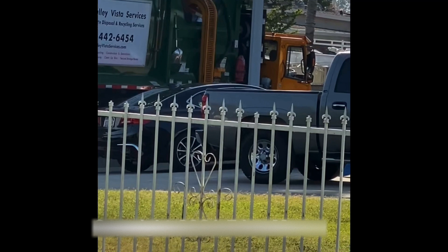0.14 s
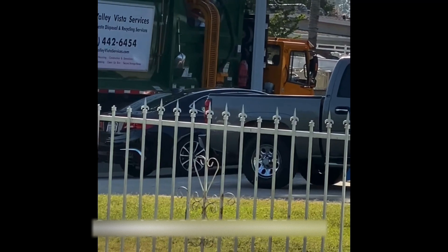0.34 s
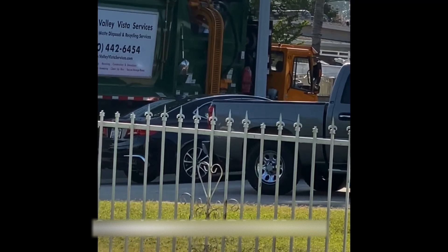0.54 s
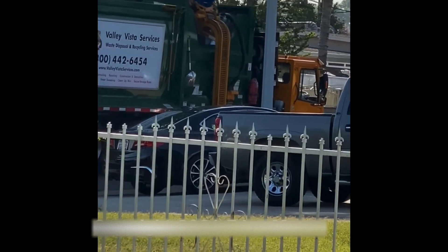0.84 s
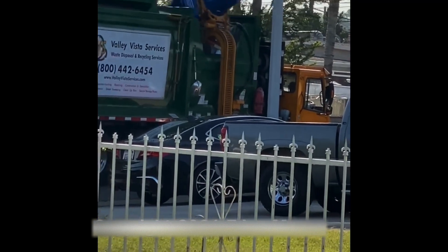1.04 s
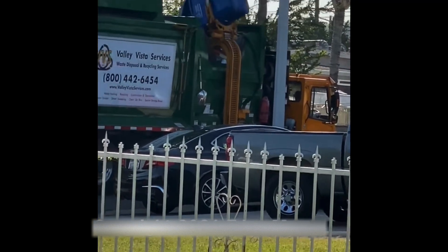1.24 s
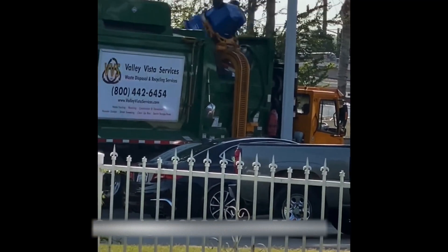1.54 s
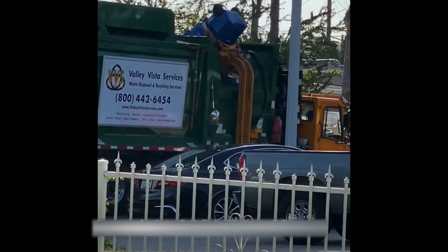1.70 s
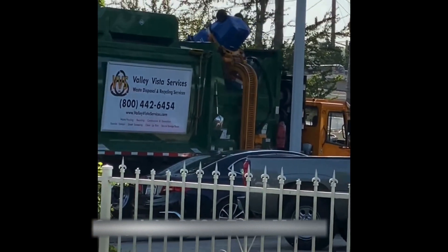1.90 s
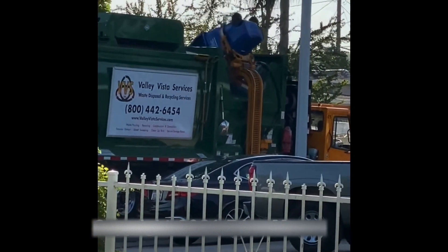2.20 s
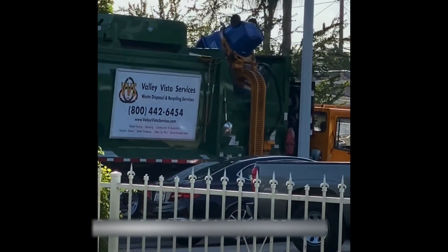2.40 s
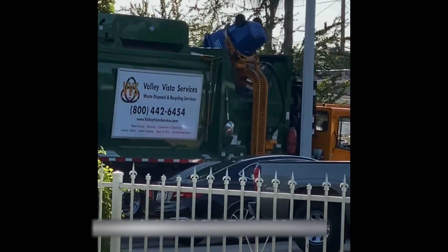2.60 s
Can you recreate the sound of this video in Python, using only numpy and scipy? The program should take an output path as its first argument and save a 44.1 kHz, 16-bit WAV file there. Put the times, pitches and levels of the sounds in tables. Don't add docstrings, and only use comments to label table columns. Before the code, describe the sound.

Loud rattling metal clanks from a refuse truck tipping a bin, with loose links clinking, panels ringing and low hopper thuds; a short pause, then renewed banging over faint engine rumble, outdoors, from a handheld microphone across the street.

```python
import sys
import numpy as np
from scipy import signal
from scipy.fft import rfft, irfft, next_fast_len
from scipy.io import wavfile
from scipy.ndimage import uniform_filter1d

SR = 44100
rng = np.random.default_rng(int(sys.argv[2]) if len(sys.argv) > 2 else 0)


def nominal_scale(level):
    x = np.asarray(level, float) / 20
    return 10 ** x


def bounce(signal):
    frames = np.transpose(np.atleast_2d(signal))
    limited = np.clip(frames, -1, 1)
    pcm = np.round(limited * 32767).astype(np.int16)
    wavfile.write(sys.argv[1], SR, pcm)


N = 121275

# start in seconds, peak in dB, tilt in dB per octave, longer ring in dB.
CLANK_BLOWS = [(0.055, -45.5, 17, -4.5), (0.1335, -19, -2.5, -3), (0.164, -26, -2.5, 2.7),
               (0.2409, -15, -1.3, 1), (0.288, -14, -4.5, -13), (0.352, -26, -2.5, 5),
               (0.4197, -21, -3.7, -4), (0.5102, -27.5, -2.5, 6.5), (0.538, -31.5, -6.5, 1.5),
               (0.947, -34, -2, -3), (1.0455, -32, -6, 2), (1.1242, -28.5, -6, 1), (1.169, -25, -5.5, 3),
               (1.2066, -11, -1.3, -1), (1.334, -23, -5, 7), (1.3736, -35, -8.5, 13),
               (1.5073, -16, -2.5, 0), (1.5885, -32, -3.5, 12.5), (1.653, -16.5, -3, 1),
               (1.7062, -18, -5.5, 6), (1.722, -13, 0.2, -7), (1.923, -34.5, -8, 2.3),
               (2.027, -29.5, -4.5, 11.5), (2.0778, -18, -3.5, -2.5), (2.1932, -29.5, -2.5, 3),
               (2.2704, -25.5, -6, 4.8), (2.3063, -14.5, 1, -4), (2.4054, -29.5, -4, 6.9),
               (2.4363, -21.5, -1.5, 0.3), (2.6056, -33, 0.5, -3), (2.7167, -35.5, -4.5, -3)]
# pitch in Hz, width in Hz, level in dB.
ARM_RESONANCES = [(1450, 64, -3), (1895, 42, -7), (1970, 21, -9), (2482, 140, -9), (2670, 59, -8),
                  (2880, 19, -8.5), (3260, 36, -10.5), (3404, 43, -7), (3993, 55, -7.5), (4200, 71, -23.5),
                  (4560, 96, -13), (5750, 130, -16.5)]
# pitch in Hz, level in dB, decay t60 in seconds.
PANEL_MODES = [(414, -13.5, 0.24), (540, -8, 0.14), (604, -3.5, 0.094), (652.6, -11, 0.24),
               (660, -21, 0.064), (868, -8.5, 0.11), (919.2, -2, 0.14), (970.6, -7, 0.1),
               (1072, -10.5, 0.26)]
# pitch in Hz, level in dB, decay t60 in seconds.
HOPPER_MODES = [(40.8, 0, 0.32), (58.6, -6.5, 0.37), (73.6, -3.5, 0.31), (89.3, -1, 0.4), (109.3, -4, 0.35),
                (142, -15, 0.11), (176.4, -10, 0.29), (259.1, -13, 0.33)]


def rms_one(x):
    return x / np.sqrt(np.mean(x ** 2) + 1e-20)


def at_hz(points, hz):
    table_hz, value = np.array(points).T
    return np.interp(np.log(hz + 1e-9), np.log(table_hz), value)


def drift(rate_hz):
    r = np.exp(-80 * np.pi * rate_hz / SR)
    slow = signal.lfilter([1], [1, -2 * r, r * r], rng.standard_normal(N // 40 + 2002))
    slow = slow[2000:]
    return np.interp(np.arange(N) / 40, np.arange(len(slow)), rms_one(slow))


def clicks(s, db):
    out = np.full(N, 1e-18)
    np.add.at(out, np.clip((s * SR).astype(int), 0, N - 1), nominal_scale(db))
    return out


def ring(x, hz, t60):
    r = nominal_scale(-60 / (t60 * SR))
    w = 2 * np.pi * hz / SR
    return signal.lfilter([0, np.sin(w)], [1, -2 * r * np.cos(w), r * r], x)


def bands():
    edges = 22 * 2 ** np.arange(0, 9.7, 1 / 3)
    white = rng.standard_normal((2, N))
    for k, (low, high) in enumerate(zip(edges, edges[1:])):
        band = signal.butter(2, [low, high], "band", fs=SR, output="sos")
        yield np.sqrt(low * high), signal.sosfilt(band, white[k % 2])


def noise_bed(spectrum, patchy_db):
    out, together = 0, drift(4.0)
    for hz, noise in bands():
        swell_db = patchy_db * (0.6 * together + drift(12.0))
        out = out + noise * nominal_scale(at_hz(spectrum, hz) + swell_db)
    return rms_one(out)


def hum(modes, patchy_db):
    out = 0
    for hz, db, t60 in modes:
        ringing = ring(rng.standard_normal(N + SR), hz, t60)[SR:]
        out = out + ringing * nominal_scale(db + patchy_db * drift(5.3))
    return rms_one(out)


def struck(hits, modes, contact_hz, spread_db):
    s, db = np.transpose(hits)
    chance = rng.standard_normal((len(s), len(modes), 2))
    out = 0
    for k, (hz, level_db, t60) in enumerate(modes):
        start = s + 0.5 / hz * np.abs(chance[:, k, 1])
        out = out + ring(clicks(start, db + level_db + spread_db * chance[:, k, 0]), hz, t60)
    return signal.lfilter(*signal.butter(2, contact_hz, fs=SR), out)


def blow_shape(hz, db, tail_db):
    # pitch in Hz, decay t60 in seconds.
    clank_decay = [(300, 0.25), (900, 0.4), (2100, 0.19), (5500, 0.15), (12000, 0.041)]
    rise_s, tail_longer = 0.0034, 3.9
    power, t60 = np.zeros(N), at_hz(clank_decay, hz)
    for (s, _, _, longer_db), level in zip(CLANK_BLOWS, db):
        i = max(int((s - 0.5 * rise_s) * SR), 0)
        t = np.arange(min(N - i, SR // 4)) / SR
        dying = nominal_scale(2 * (level - 60 * t / (t60 * nominal_scale(longer_db))))
        power[i:i + len(t)] += dying * np.minimum(t / rise_s, 1) ** 2
    r = nominal_scale(-120 / (t60 * tail_longer * SR))
    echoes = clicks(np.array(CLANK_BLOWS)[:, 0] + 0.013, 2 * (db + tail_db))
    tail = signal.lfilter([1], [1, -r], echoes)
    return np.sqrt(power + uniform_filter1d(tail, size=600))


def clanks():
    # pitch in Hz, level in dB per Hz.
    clank_colour = [(200, -20.5), (700, -4.5), (1300, -2), (2600, -4.5), (4200, 2.5), (5500, -3),
                    (9000, 1.5), (15000, -46.5)]
    _, db, tilt, _ = np.transpose(CLANK_BLOWS)
    out, spread = 0, rng.standard_normal((len(db), 50))
    for k, (hz, noise) in enumerate(bands()):
        if hz > 180:
            level = db + at_hz(clank_colour, hz) + tilt * np.log2(hz / 3500) + 3 * spread[:, k]
            out = out + noise * blow_shape(hz, level, -16)
    grit = rms_one(rng.standard_normal(N) * nominal_scale(2.0 * drift(150.0)))
    for k, (hz, width_hz, mode_db) in enumerate(ARM_RESONANCES):
        level = db + mode_db + 12 + tilt * np.log2(hz / 3500) + 2.8 * spread[:, -1 - k]
        drive = grit * blow_shape(hz, level, -32.5)
        r = np.exp(-np.pi * width_hz / SR)
        poles = [1, -2 * r * np.cos(2 * np.pi * hz / SR), r * r]
        out = out + signal.lfilter(np.array([1, 0, -1]) * (1 - r * r) / 2, poles, drive)
    rattle_db = 1.0 * drift(74.0)
    return nominal_scale(-10 + 7.5 + rattle_db) * out


def small_parts(hits, t60):
    rise_s, late_s, partner_db, pitch_spread = 0.00089, 0.002, -7, 0.045
    out, t = np.zeros(N + SR), np.arange(SR // 4) / SR
    chance = rng.uniform(-1.136, 1, (len(hits), 2, 3, 1))
    for (s, db, hz), (apart, turn) in zip(hits, chance):
        partner_hz = hz * (1 + pitch_spread * apart)
        partners = np.sin(2 * np.pi * partner_hz * t + np.pi * turn).sum(axis=0)
        cluster = np.sin(2 * np.pi * hz * t) + nominal_scale(partner_db) * partners
        i = int((s + late_s) * SR)
        out[i:i + len(t)] += cluster * nominal_scale(db - 60 * t / t60) * (1 - np.exp(-t / rise_s))
    return out[:N]


def arm_clinks():
    # start in seconds, peak in dB, pitch in Hz.
    clink_hits = [(0.1394, -25, 2470), (0.1409, -34, 4150), (0.1445, -35.5, 4520), (0.1633, -28, 2540),
                  (0.1648, -27, 4150), (0.1684, -24.5, 1433), (0.2366, -29, 2810), (0.2366, -21.5, 4170),
                  (0.241, -29, 5810), (0.2533, -20, 1480), (0.2816, -28, 4080), (0.3527, -30, 4040),
                  (1.0479, -32.5, 1890), (1.0486, -32.4, 2665), (1.1241, -35, 3510), (1.2053, -26.5, 4370),
                  (1.2075, -25.5, 2040), (1.2075, -27, 3900), (1.2082, -37.5, 5570), (1.2097, -30, 2920),
                  (1.2104, -33, 2370), (1.2111, -34, 3445), (1.2133, -33.5, 6244), (1.2228, -27.5, 4220),
                  (1.3403, -28.5, 2088), (1.3418, -28.5, 4651), (1.5065, -29.5, 4360), (1.5087, -27, 1460),
                  (1.5094, -28, 2380), (1.5101, -39.5, 4080), (1.5174, -31.6, 3400), (1.6523, -29.5, 1973),
                  (1.6603, -26.5, 3540), (1.7191, -25.5, 5297), (1.7191, -20, 4155), (1.7205, -21.7, 1960),
                  (2.0761, -29.5, 5469), (2.0761, -37.5, 2750), (2.0761, -25.5, 4091), (2.0768, -32, 5900),
                  (2.0884, -25, 1494), (2.2706, -30, 2696), (2.272, -35, 3531), (2.3047, -27, 2490),
                  (2.3054, -31.5, 4650), (2.3054, -20, 4060), (2.3068, -44.5, 3450), (2.3076, -26, 2024),
                  (2.309, -28, 6201), (2.4041, -33, 3488), (2.4404, -29.0, 4074), (2.4462, -33, 2640)]
    return small_parts(clink_hits, t60=0.075)


def loose_taps():
    # start in seconds, peak in dB, pitch in Hz.
    tap_hits = [(.195, -21.5, 937), (.262, -19.5, 857), (.355, -29, 4670), (1.089, -23, 926),
                (1.143, -25.5, 925), (1.172, -30, 3430), (1.172, -41, 2625), (1.28, -37, 2050),
                (1.375, -30, 3560), (1.39, -35, 3050), (1.587, -20, 904), (1.592, -29, 3240),
                (1.641, -28, 3860), (1.641, -30, 3440), (1.661, -15, 865), (1.675, -21.5, 952),
                (1.703, -18, 900), (1.735, -19.5, 887), (2.190, -29, 2610), (2.190, -32, 3400),
                (2.528, -25.5, 626), (2.581, -36.5, 3330), (2.605, -36.5, 2570), (2.605, -44, 4010),
                (2.719, -39.5, 2050)]
    return small_parts(tap_hits, t60=0.045)


def side_panel():
    # start in seconds, peak in dB.
    panel_knocks = [(0.159, -18), (0.194, -27), (0.242, -27), (0.264, -28), (0.322, -26.5), (0.379, -24),
                    (0.465, -17.5), (0.564, -24), (0.627, -23), (0.654, -32), (0.947, -31.5), (1.09, -24),
                    (1.143, -21), (1.216, -12), (1.333, -31), (1.406, -16), (1.459, -20), (1.589, -33),
                    (1.663, -23), (1.677, -12), (1.728, -12), (1.81, -23.5), (2.096, -17), (2.233, -25),
                    (2.288, -15), (2.321, -14.5), (2.422, -21), (2.526, -26.5)]
    return nominal_scale(-8) * struck(panel_knocks, PANEL_MODES, contact_hz=1800, spread_db=2.94)


def hopper_thuds():
    # start in seconds, peak in dB.
    thud_hits = [(.125, -39), (.155, -21.5), (.2, -29.5), (.232, -11.5), (.455, -28), (.535, -25),
                 (1.085, -27), (1.212, -14), (1.335, -19), (1.4, -17.5), (1.5, -37), (1.62, -20),
                 (1.718, -12.5), (1.79, -21), (1.855, -20.5), (2.085, -33), (2.13, -24.5), (2.3, -18),
                 (2.44, -19.5), (2.55, -42.5)]
    return nominal_scale(-9.5) * struck(thud_hits, HOPPER_MODES, contact_hz=225, spread_db=4.0)


def shaken_body():
    # time in seconds, level in dB.
    shake = [(0, -41.5), (.09, -49.5), (0.201, -32), (0.599, -39.5), (0.848, -44), (1.05, -44),
             (1.302, -36.5), (1.748, -36.5), (2.05, -39.5), (2.23, -46), (2.4, -40), (2.75, -42)]
    # pitch in Hz, level in dB per Hz.
    rumble_colour = [(25, -4), (45, 7.5), (110, -1), (200, -23.5), (600, -11), (1500, -18), (4500, -31.5),
                     (15000, -47)]
    s, db = np.transpose(shake)
    shake_db = np.interp(np.arange(N) / SR, s, db)
    steel = nominal_scale(-7) * hum(PANEL_MODES, 5.1) + nominal_scale(-5) * hum(HOPPER_MODES, 3.6)
    rumble = noise_bed(rumble_colour, patchy_db=1.8)
    arm_modes = [(hz, db, 2.7 / width_hz) for hz, width_hz, db in ARM_RESONANCES]
    arm = nominal_scale(-16) * hum(arm_modes, 2.7)
    return nominal_scale(shake_db + 6.5) * (rumble + steel + arm)


def engine():
    firing_hz, jitter, exhaust_hz = 44.5, 0.029, 85
    chance = rng.standard_normal((200, 2))
    s = np.cumsum(1 + jitter * chance[:, 0]) / firing_hz
    heard = s < N / SR
    fired = clicks(s[heard], 2.0 * chance[heard, 1])
    return nominal_scale(-45) * rms_one(ring(fired, exhaust_hz, 0.11) + ring(fired, firing_hz, 0.053))


def street():
    # pitch in Hz, level in dB per Hz.
    street_colour = [(150, 18.5), (300, 10), (700, -1.5), (1500, -5), (4200, -21), (6000, 4.5),
                     (9000, -22.5), (15000, -11)]
    return nominal_scale(-51.5) * noise_bed(street_colour, patchy_db=1.7)


def scene():
    mono = clanks() + arm_clinks() + loose_taps()
    mono = mono + side_panel() + hopper_thuds() + shaken_body()
    mono = mono + engine() + street()
    return np.array([mono, mono])


def low_pass(x):
    return signal.sosfilt(signal.butter(12, 15820, fs=SR, output="sos"), x)


def record(dry):
    # pitch in Hz, lead in radians.
    lead_low = [(230, 0.0), (430, .95), (640, -.3), (790, -.3), (950, 1.5), (1050, 2.0), (1180, -1.8),
                (1350, 0.0)]
    lead_high = [(2000, -.3), (2500, -.65), (3900, -.25), (4300, -.65), (4750, -1.75), (5000, -2.8),
                 (5400, -1.6), (8100, -3.12)]
    # pitch in Hz, likeness from 0 to 1.
    likeness = [(200, .99995), (430, .78), (700, .3), (950, .72), (1200, .35), (2000, .94), (4000, .95),
                (5100, .9), (8400, .998)]
    # pitch in Hz, level in dB.
    left_dip = [(420, 0.0), (540, -6.5), (700, 1.5), (900, 1.5), (1120, -9), (1500, -5), (2100, 0.0)]
    size = next_fast_len(N + 8192)
    hz = np.arange(size // 2 + 1) * SR / size
    sound = rfft(signal.lfilter(*signal.butter(2, 33.7, "high", fs=SR), dry[0]), size)
    fading = np.exp(-np.arange(4096) / SR / 0.025)
    scatter = rfft(rng.standard_normal(4096) * fading, size)
    top_unlike = 0.9 / (1 + (14600 / (hz + 1)) ** 16)
    alike = np.clip(at_hz(likeness, hz) - top_unlike, 0, 1)
    lead = at_hz(lead_low, hz) + at_hz(lead_high, hz) * np.minimum(hz / 1400, 1) ** 4
    turn = np.exp(0.5j * lead)
    same = np.sqrt((1 + alike) / 2)
    other = np.sqrt((1 - alike) / 2) * scatter / np.abs(scatter)
    ports = [(same + other) / turn * nominal_scale(at_hz(left_dip, hz)), (same - other) * turn]
    mic_top = np.sqrt(1 + (hz / 14500) ** 12)
    return low_pass(irfft(sound * ports / mic_top, size)[:, :N])


dry = scene()
out = record(dry)
bounce(out)
```